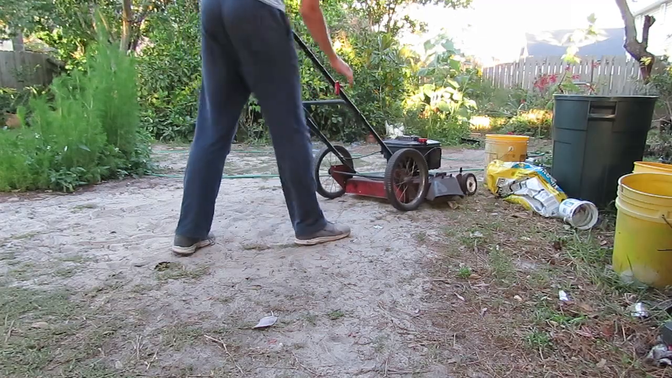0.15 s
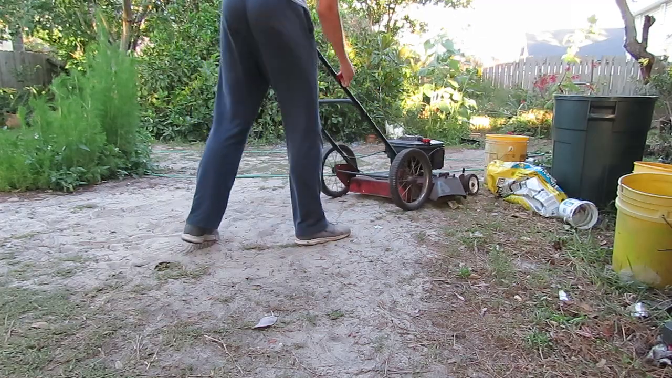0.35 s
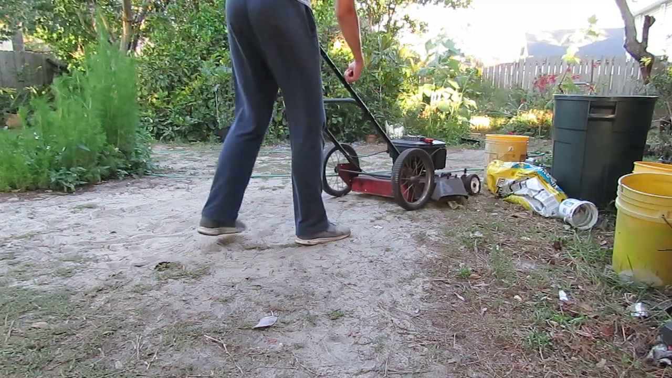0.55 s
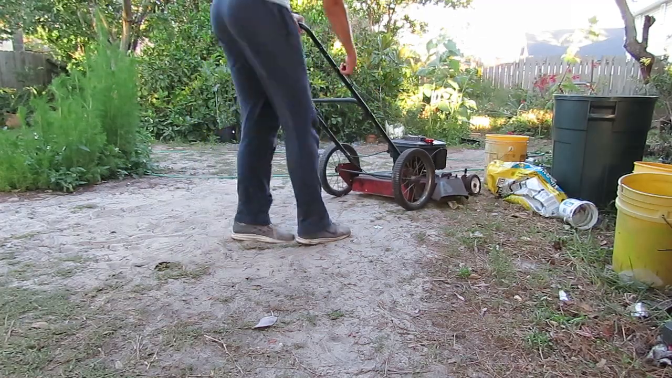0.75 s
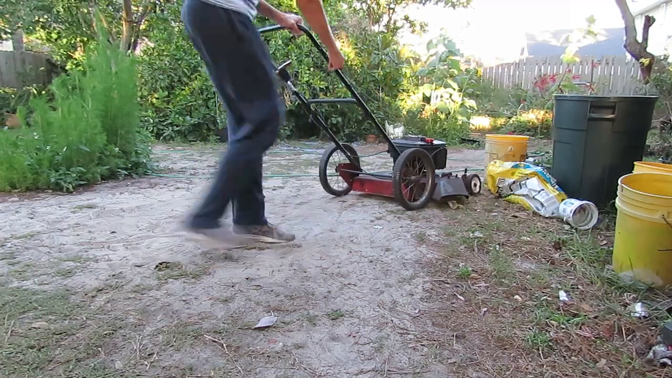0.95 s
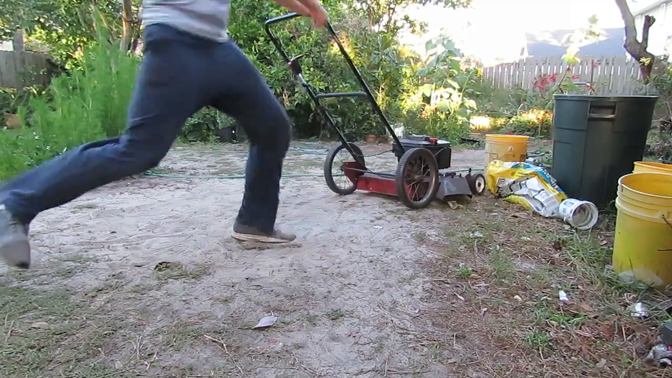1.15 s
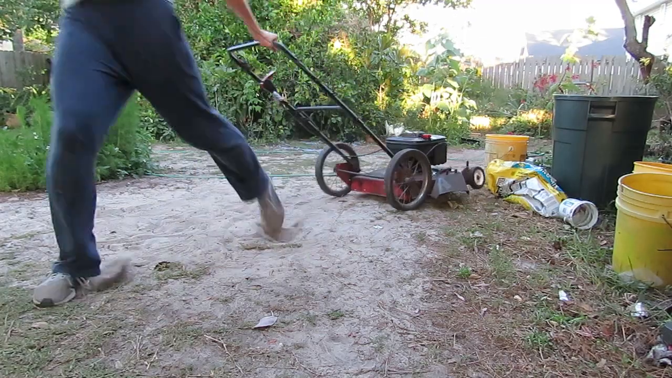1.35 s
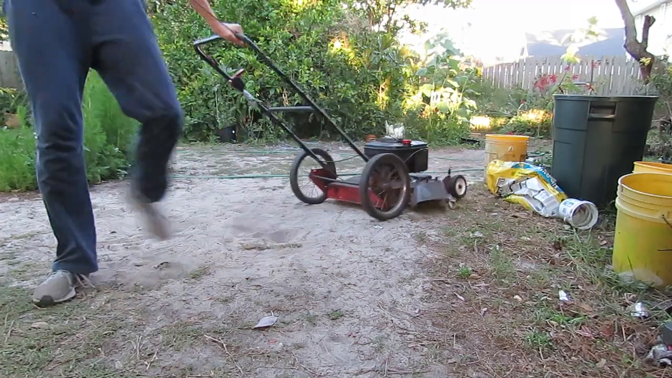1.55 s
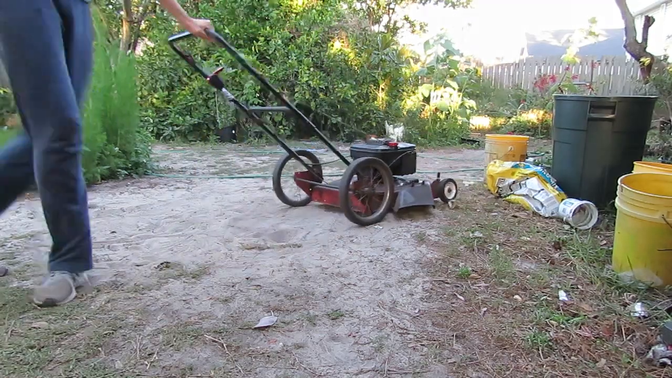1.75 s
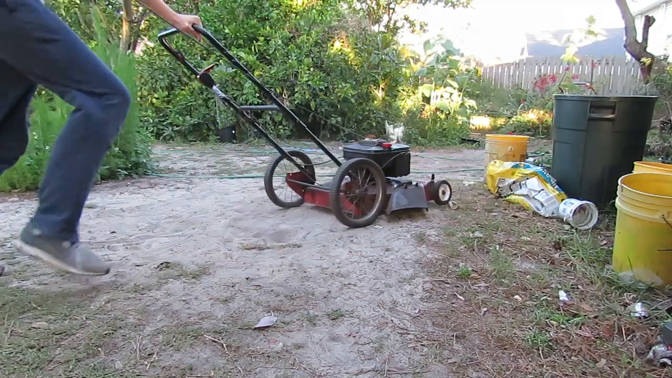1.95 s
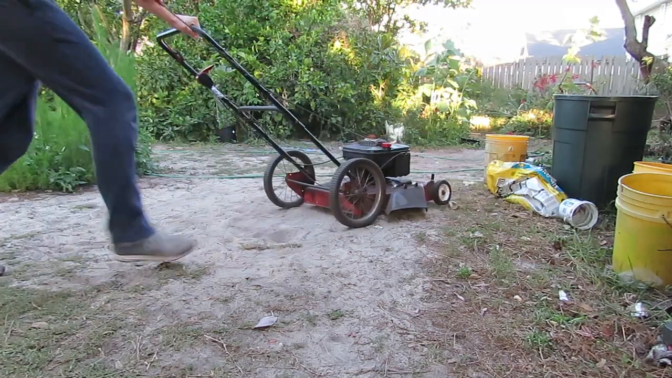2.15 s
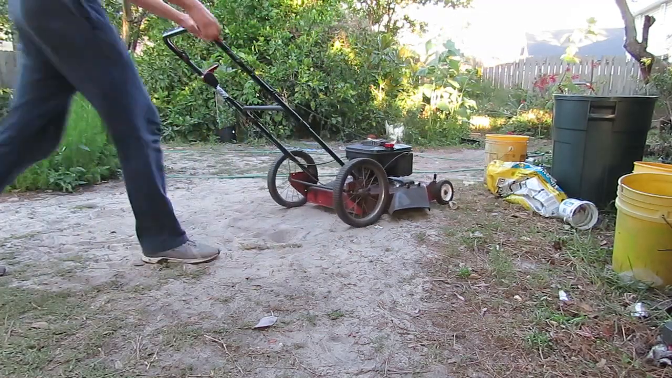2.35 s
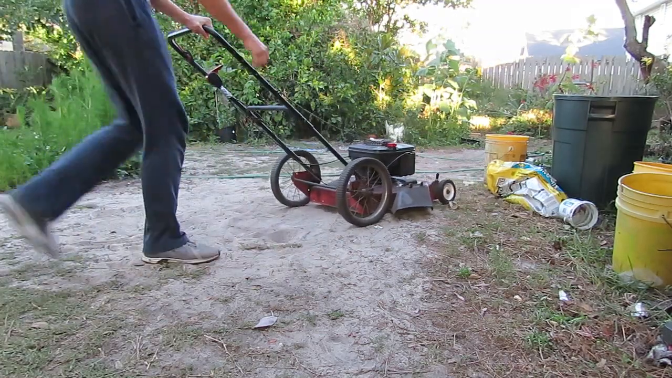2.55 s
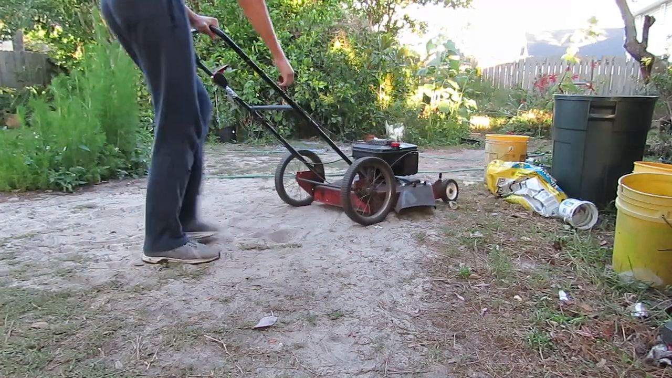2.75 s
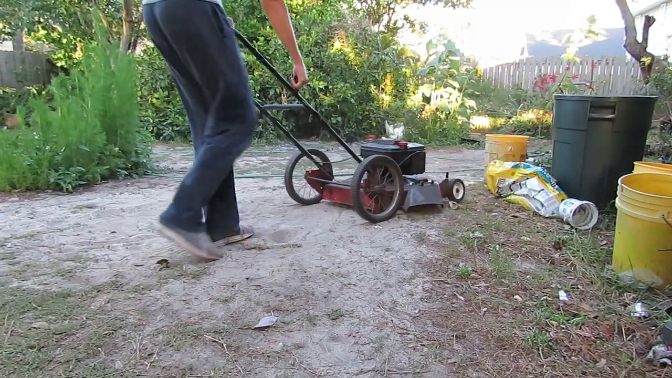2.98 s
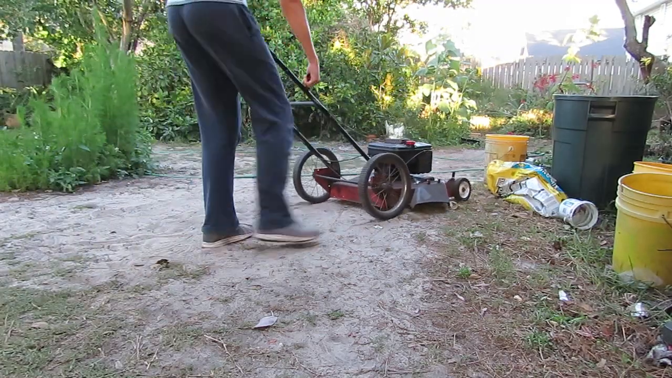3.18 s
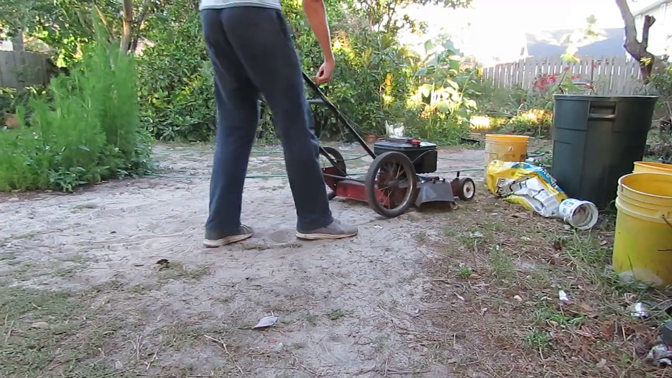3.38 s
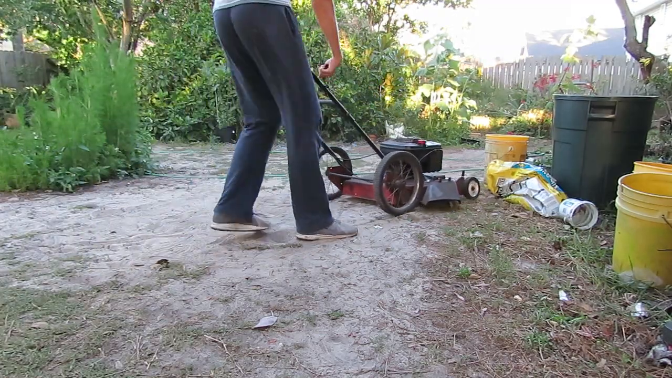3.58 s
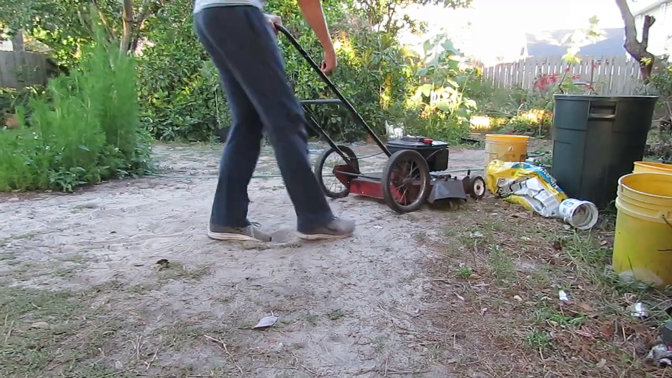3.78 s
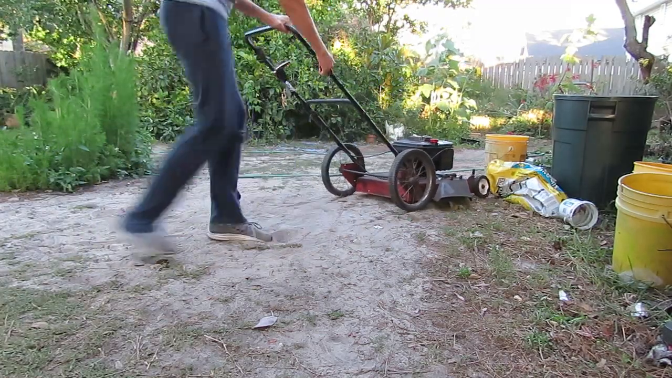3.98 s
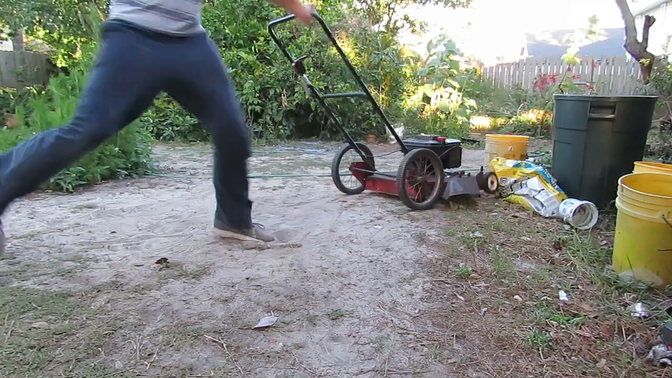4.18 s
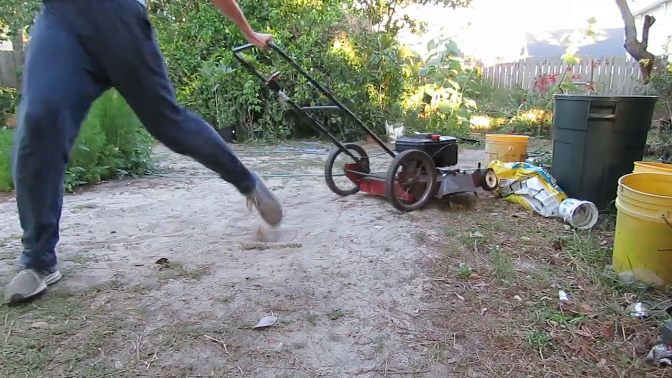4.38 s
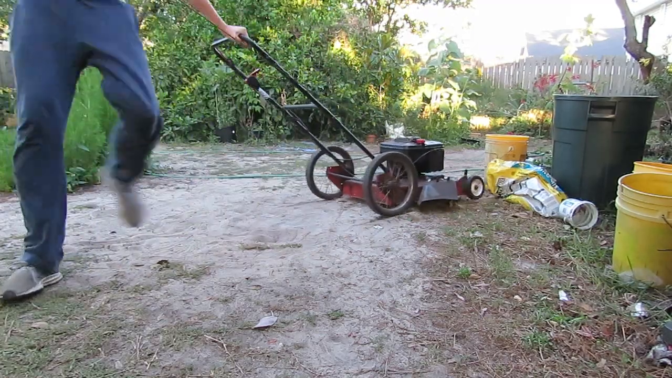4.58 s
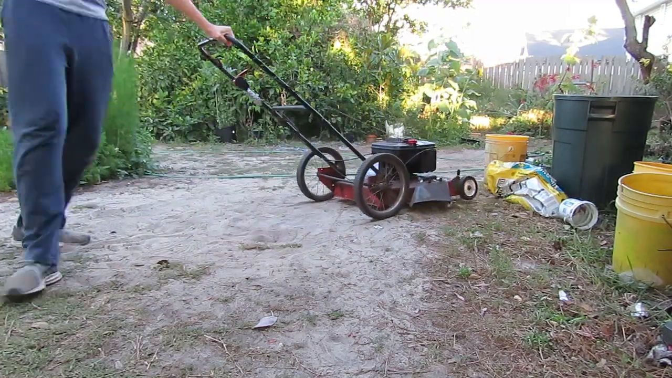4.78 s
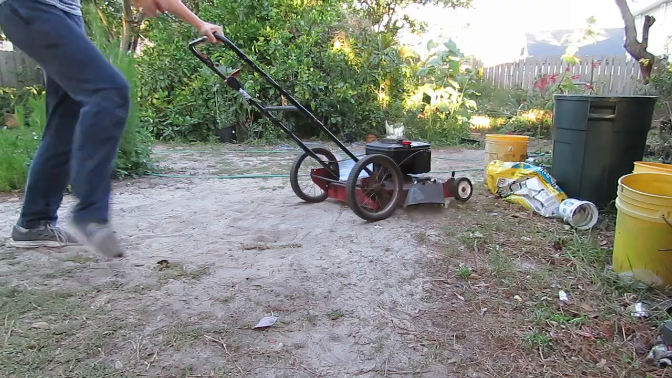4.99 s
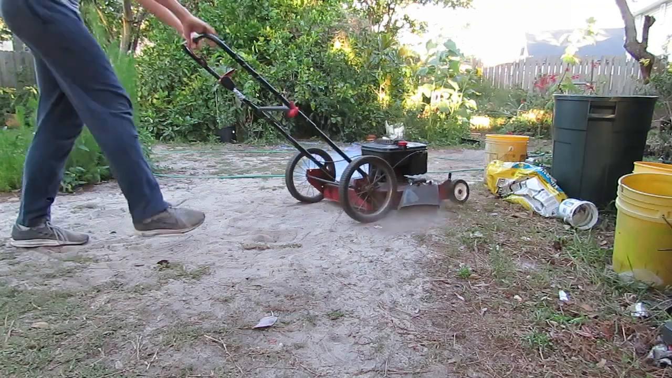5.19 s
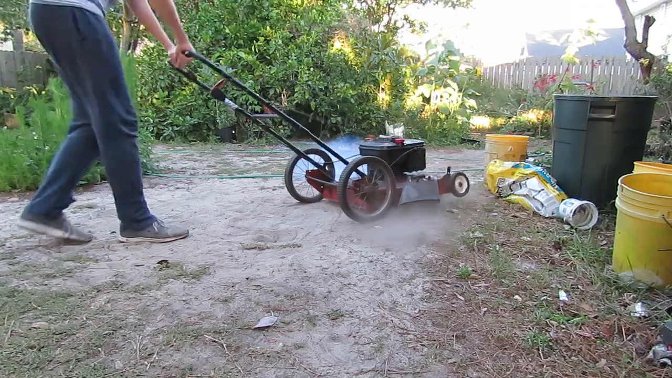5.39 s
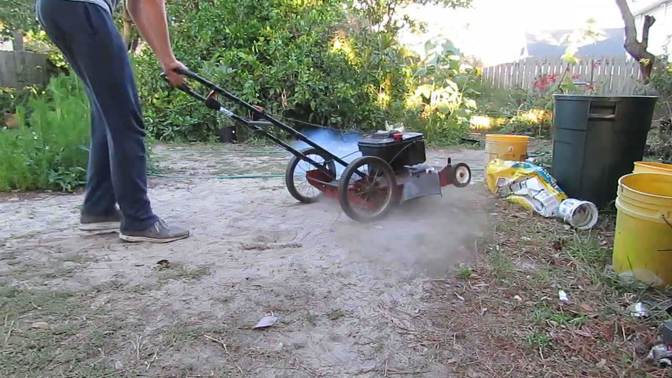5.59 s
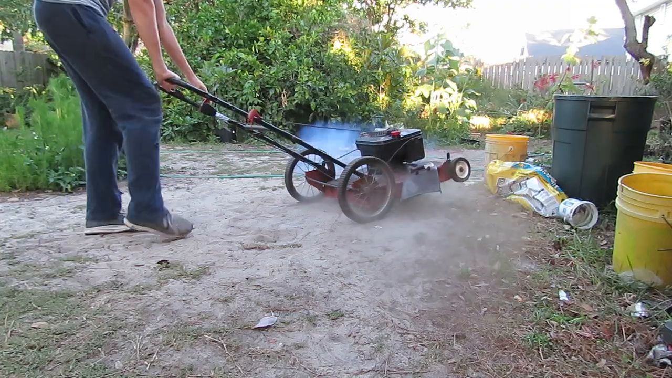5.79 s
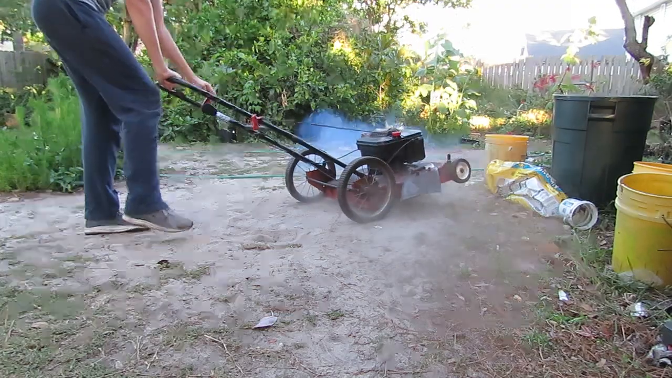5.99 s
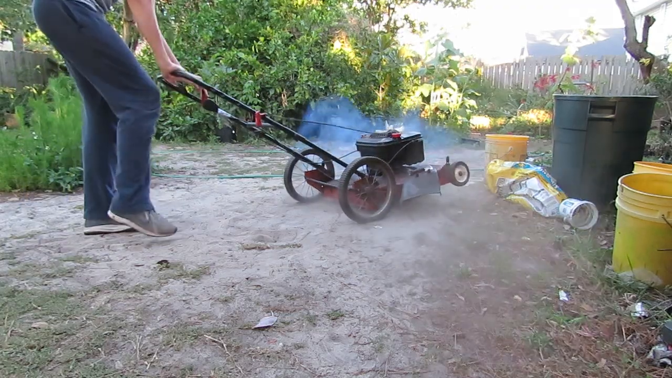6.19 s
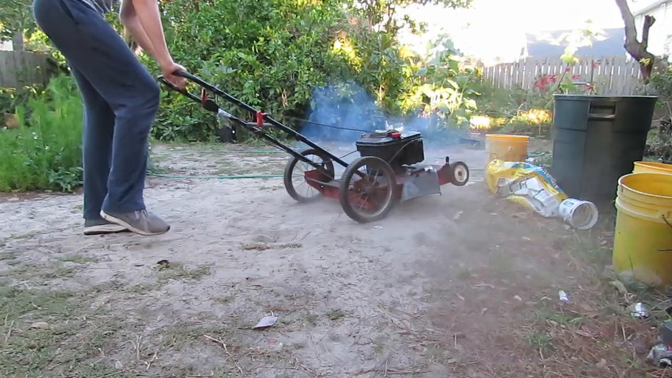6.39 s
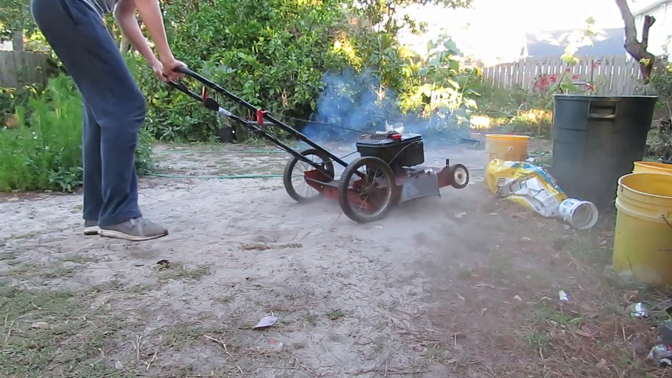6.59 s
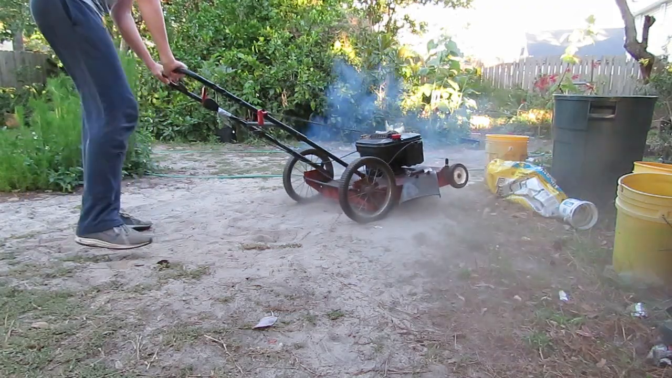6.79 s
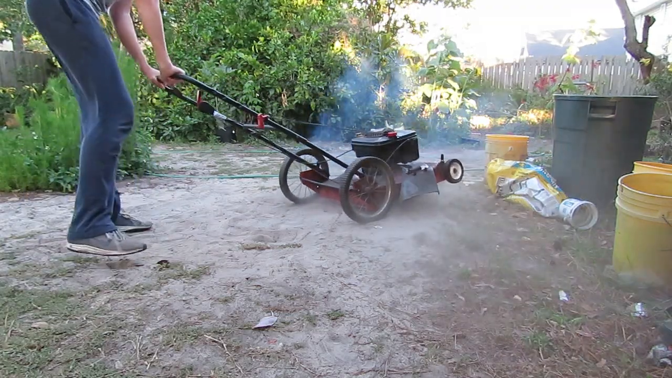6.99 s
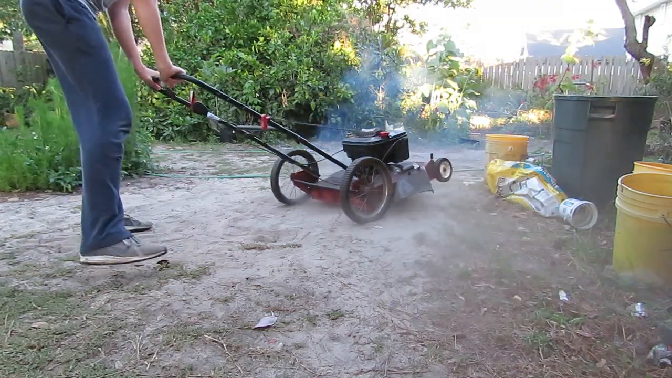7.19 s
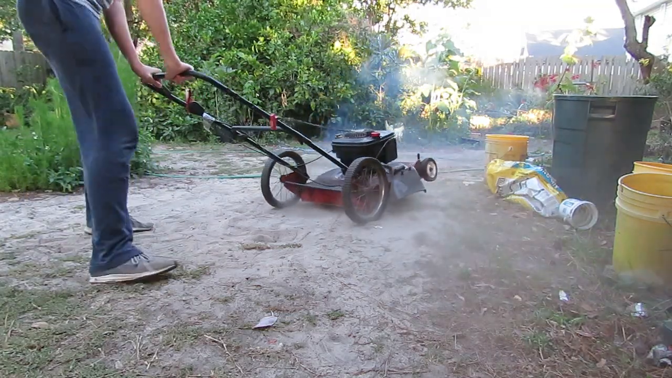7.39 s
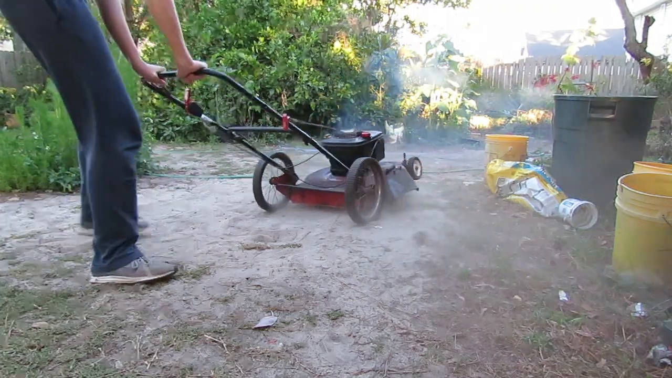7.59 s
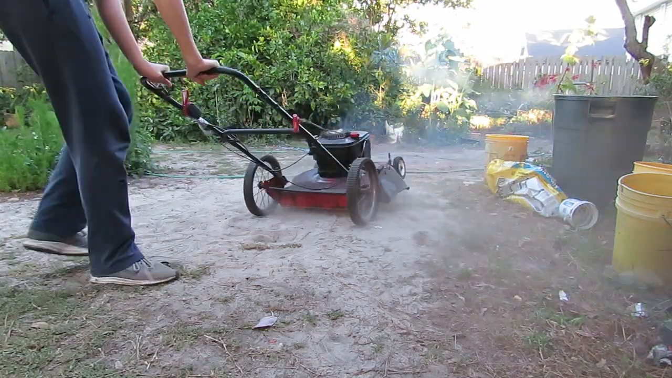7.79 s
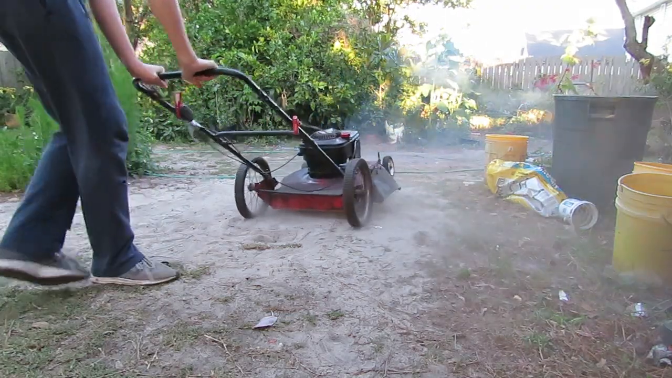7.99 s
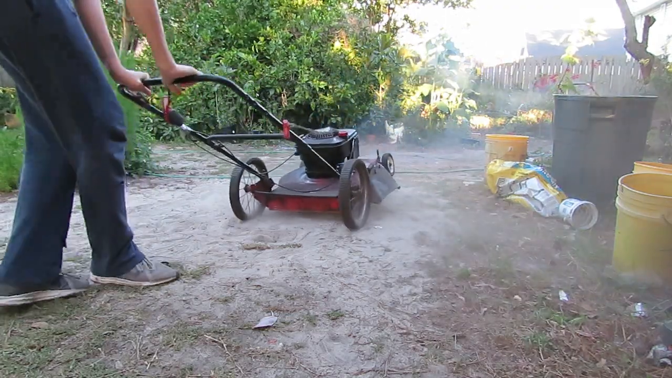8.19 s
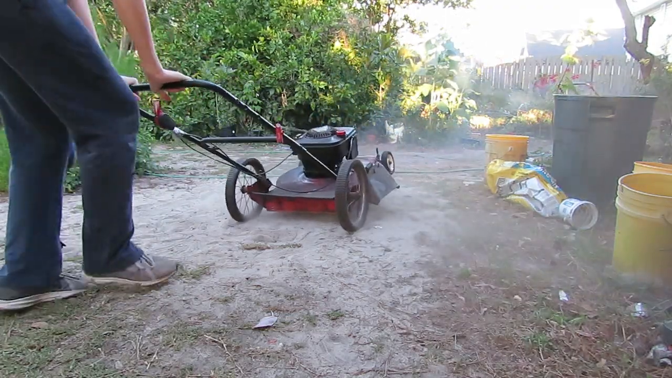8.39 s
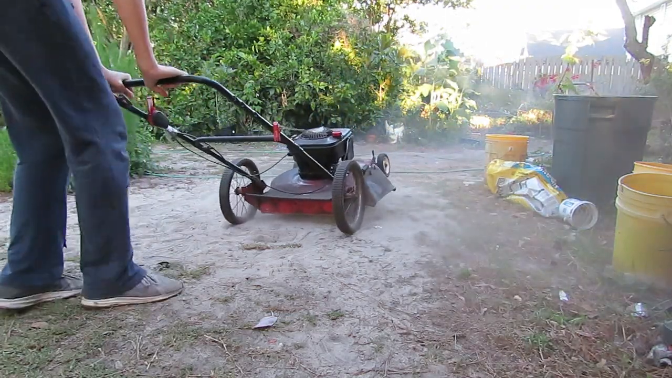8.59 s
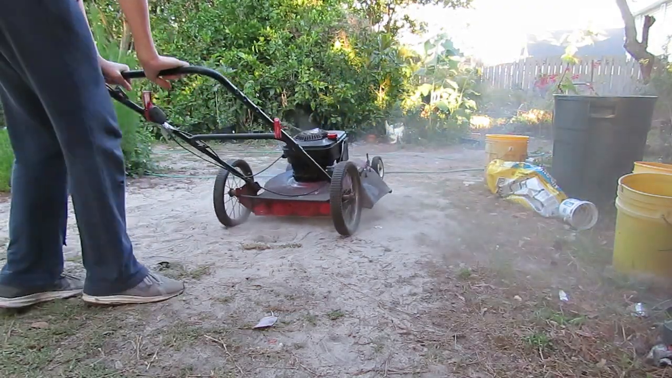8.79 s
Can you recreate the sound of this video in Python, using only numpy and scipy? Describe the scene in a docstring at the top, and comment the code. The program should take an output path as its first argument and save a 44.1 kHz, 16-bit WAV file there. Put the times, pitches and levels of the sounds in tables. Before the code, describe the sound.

Close outdoor stereo sound of an old petrol mower on bare ground. A first cord pull only cranks it, with clacking pawls, low thuds, a squeaky pulley and rope winding back in pulses. Soft footsteps follow. The second pull catches with separate barking pops that blur into a fast throaty putter, joined by blade wind, valve clatter and loose guards; the tone shifts slightly as the mower is turned, running on to the end.

```python
"""Pull-starting a petrol lawn mower

On bare earth in a back yard, a first pull only cranks the engine: recoil rattle, knocks, a scraping rope.
On the second pull the single cylinder fires, gathers speed and runs steadily while the mower is turned.
The exhaust is a train of pressure pulses topped by gated noise; valve gear and guards are clicked noise.
Blade wind is throbbing noise with tones locked to the firing rate; steel parts are decaying modes;
outdoor air is a hush."""
import sys
import numpy as np
from scipy import signal
from scipy.fft import irfft
from scipy.io import wavfile

SR = 44100
rng = np.random.default_rng(int(sys.argv[2]) if len(sys.argv) > 2 else 0)


def digitize_waveform(pressure):
    """Quantize a signal to 16-bit integers and store it at the path in sys.argv[1].

    Rows of a 2-D input are taken as channels; values are limited to [-1, 1].
    """
    field = np.atleast_2d(pressure).T
    bounded = np.clip(field, -1, 1)
    quanta = np.round(bounded * 32767).astype(np.int16)
    wavfile.write(sys.argv[1], SR, quanta)


N = 390285
TIME = np.arange(N) / SR
PAST_END_S = 10  # closes a gate after the scene is over

# Engine speed, one firing for two turns of the blade: (time [s], rate [firings/s])
FIRING_RATE = [(4.6375, 9.1), (4.78, 11.41), (4.95, 15.64), (5.15, 21.03), (5.35, 25.93), (5.5, 28.06),
               (5.65, 26.78), (5.85, 26.9), (6.1, 26.09), (6.35, 26.87), (6.65, 27.18), (7, 27.06),
               (7.35, 27.15), (7.6, 26.96), (8, 27.11), (8.35, 27.13), (8.85, 27.35)]
# Throttle, open at first, shut on overshoot, then corrected: (time [s], opening [0-1])
THROTTLE_OPENING = [(5.35, 1), (5.52, 0.18), (5.76, 0), (5.88, 0.42), (6.08, 0.43), (6.24, 0.06),
                    (6.6, 0.1), (8.85, 0)]
# The mower is swung round: (time [s], share heard from the side [0-1])
TURNING = [(4.75, 0), (5.75, 0.11), (7.2, 0), (7.7, 0.94), (8.85, 0.99)]
STEADY_S = 6  # engine noises are normalised on what follows

# Strength of the exhaust pulses: (time [s], level [dB])
EXHAUST_LEVEL = [(4.63, -21), (5.05, -23), (5.5, -25.5), (5.75, -28), (5.87, -21.5), (7.2, -23),
                 (7.7, -21.5), (8.85, -22.5)]
# Exhaust pulse spectra, from behind and from the side: (frequency [Hz], level [dB])
PULSE_REAR = [(27, -46), (54, -16), (81, -21), (108, -3), (136, -2), (162, -3.5), (190, 0), (217, -4),
              (272, -4), (298, -9), (325, -8), (375, -17), (435, -9), (520, -14), (750, -22), (1200, -28),
              (2400, -44), (8000, -70)]
PULSE_SIDE = [(27, -44), (54, -17), (81, -26), (108, -10), (136, -3), (162, -10), (190, 0), (217, -3),
              (245, -3), (272, -1), (300, -3), (352, -9), (385, -16), (500, -13), (620, -15), (750, -24),
              (1600, -30), (8000, -75)]
# Bins, fence and wall scatter the pulse: (delay [s], polarity [+1 or -1])
PULSE_SCATTER = [(.0071, 1), (.0174, -1), (.0237, -1)]
PULSE_PEAK_S, PULSE_SUCTION, PULSE_DIRECT = .002, .45, .935  # delay; quadrature part; all-pass coefficient
# Spectra of the hot gas's crack, the opening valve's spit and the bark: (frequency [Hz], level [dB])
CRACK_SPECTRUM = [(100, 1.5), (500, 23), (2000, 1.5), (3500, 15.5), (6000, 13.5), (9000, 7), (11200, 9.5),
                  (13000, 6.5), (16000, -35)]
SPIT_SPECTRUM = [(100, -40), (2000, -18), (4500, -13), (6500, -2), (9500, -6), (11200, 9), (12300, -12),
                 (14000, -12), (16000, -19)]
BARK_SPECTRUM = [(200, -18), (700, 5.5), (950, 11.5), (1250, -6), (1500, 3.5), (1800, 4.5), (2150, 5.5),
                 (2500, 5), (3000, 0), (3700, -0.5), (4400, -2), (5500, -7), (7000, -15), (12000, -21)]
SPIT_S, SPIT_UNEVEN_DB = .0007, 4
FULL_CHARGE_S = 4.72  # the first firing is feeble; later ones burn a full charge
# Slow firings bark; the bark fades [dB per firing/s] above a given rate [firings/s]
BARK_DB, BARK_FADES_ABOVE, BARK_FADE_DB, BARK_THROTTLE_DB = -27, 17.8, 1.4, 5
BARK_ECHO_S, BARK_ECHO_DB = .0052, -6  # thrown back by the bins
# Modes of the muffler can: (frequency [Hz], level [dB], t60 [s])
MUFFLER_MODES = [(684, -7, .025), (1480, 0, .025), (1790, -1, .018), (2400, -1, .018), (2650, -4, .015),
                 (3270, -7, .014), (4230, -12, .02), (4550, -10, .02), (5250, -11, .02), (6870, -14, .03),
                 (8260, -16, .04)]

# Level laws of the engine noises: (at final speed [dB], added by open throttle [dB],
# per octave of speed [dB], added from the side [dB])
CRACK_LAW = (-41, 14, 1.5, -2.5)
SPIT_LAW = (-44.5, 8, -2, -6)
HISS_LAW = (-37, 8, 3.5, -2.5)
ROAR_LAW = (-23, 2.5, -1, 0.8)
CLATTER_LAW = (-27.5, -12.5, 4, -4.5)
TIN_LAW = (-37, 4, 2, -1)
SPRING_LAW = (-56, 5, -2, -3)

# Blows of valve gear and piston: (share of the cycle [0-1], level [dB])
VALVE_BLOWS = [(0.032, -4), (.21, 1.5), (.45, -21), (.62, -1), (0.828, -3)]
# Spectra of valve clatter, air hiss, and blade roar from behind and the side: (frequency [Hz], level [dB])
CLATTER_SPECTRUM = [(250, -40), (380, -13), (470, -6), (650, -10), (900, 1), (1600, -1), (2400, -11),
                    (5000, -23), (12000, -38)]
HISS_SPECTRUM = [(1000, -20), (3000, 8), (4400, 3), (7000, -2), (9300, -10), (10600, -11), (13000, -6.5),
                 (16000, -36)]
ROAR_REAR = [(20, -42), (75, -24), (120, -9), (200, -6), (240, -6), (295, 1), (360, -5), (435, 0),
             (520, -7), (600, -4.5), (700, -4), (850, -1), (1400, -4), (1720, -6), (2050, -6), (2600, -14),
             (3300, -20), (6000, -49)]
ROAR_ASIDE = [(20, -30), (75, -16), (120, -10), (200, -4), (240, -4), (285, 2), (350, -2.5), (480, 0),
              (560, -3), (680, 1), (750, -1), (930, 2.5), (1150, 1), (1550, 1.5), (2050, -4), (2800, -11.5),
              (6000, -46)]
ROAR_GRIT, ROAR_FLUTTER_DB = .7, 1.1
# The mower is tipped and moved, swelling the roar: (time [s], level [dB])
ROAR_SWELL = [(5.2, -4.5), (5.33, 0), (5.49, -2), (5.75, 2), (5.9, 2), (6.02, -1), (6.5, 2.5), (6.82, 0.5),
              (7.0, 2), (7.24, -0.5), (7.48, 1), (7.56, 2.5), (8.04, 0.1), (8.46, 2.5), (8.6, 1.8),
              (8.76, 2.5)]
# Ribs and shroud of the deck: (frequency from behind [Hz], frequency from the side [Hz], width [Hz],
# level from behind [dB], level from the side [dB])
SHROUD_MODES = [(314, 304, 12, -36.5, -38), (431, 504, 14, -35, -41), (842, 874, 29, -35.5, -34),
                (960, 970, 34, -37, -33.5), (1362, 1510, 19, -35.5, -44), (2010, 1950, 27, -37.5, -38),
                (2280, 2200, 38, -46, -66), (3100, 3000, 46, -47, -42.5), (4530, 3500, 60, -49, -45)]
SHROUD_WAVER_DB, SHROUD_DRIFT = 1.5, .007
# Loose guards shaken in each cycle: (share of the cycle [0-1], level [dB])
GUARD_HITS = [(.21, 1), (.29, -3.5), (.58, -6), (.82, -3.5)]
# Spectrum of the guards: (frequency [Hz], level [dB])
GUARD_SPECTRUM = [(500, -32), (1500, -1.5), (2200, -7), (3200, 2), (5200, 1), (7000, -6.5), (9500, -17),
                  (16000, -31)]
TIN_UNEVEN_DB, TIN_JITTER_S, TIN_DECAY_S = 3.2, .0007, .0019
# Tones of blade and fan: (multiple of the firing rate, level from behind [dB], level from the side [dB])
BLADE_ORDERS = [(12, -40, -44), (16, -32, -35.5), (17, -38, -42), (18, -39, -38), (20, -38, -43),
                (23, -52, -40), (30, -36, -43), (33, -41, -41), (36, -38, -39)]

# Pulls of the rope: (pawls catch [s], crank at speed [s], rope let go [s],
# crank stops or engine takes over [s], rattle level [dB], scrape level [dB])
ROPE_PULLS = [(1.222, 1.366, 1.604, 2.7, -22, -31.5), (4.22, 4.37, 4.72, 4.8, -20, -31.5)]
CATCH_DB, CATCH_DECAY_S = -0.5, 0.059  # the jolt as the pawls catch
SLACK_S, SLACK_DB = 0.096, -17  # slack rope runs out before the catch
SPIN_UP_S, COAST_S = 0.046, 0.12  # time to spin up; time in which the released spin halves
CHUGS_PER_S, CHUG_DELAY_S, CHUG_DB = 9.4, .045, 2  # the crank chugs at each compression stroke
REWIND_START_S, REWIND_END_S, REWIND_FADE_S, REWIND_DB = 1.73, 2.675, .06, -41
FIRST_SURGE_S, REWIND_TURNS_PER_S, REWIND_SLOWING_PER_S2 = 1.77, 13.15, 5.3
SURGE_DB, SURGE_GROWTH_DB_PER_S = 3, 3.6
# Spectra of the recoil's rattle and the rope's scrape: (frequency [Hz], level [dB])
RATTLE_SPECTRUM = [(40, -64), (100, -18), (165, -7), (208, 1), (294, -0.5), (364, -1), (458, 0.5), (612, 0),
                   (1010, -2.5), (1370, -3.5), (2000, -4), (3030, -12), (3500, -13.5), (5000, -21),
                   (7000, -48)]
SCRAPE_SPECTRUM = [(60, -5), (500, 6), (1500, 12.5), (3200, -6.5), (4500, 3), (5700, 3), (7000, 4),
                   (8200, -6.5), (9000, -7), (11500, -12.5), (13500, -5), (16000, -59)]
# Pawls strike the starter cup: (time [s], level [dB])
PAWL_STRIKES = [(1.255, -16.5), (4.252, -29)]
# Modes of the starter cup and of the steel deck: (frequency [Hz], level [dB], t60 [s])
CUP_MODES = [(2340, -6, 0.13), (2800, -10, 0.035), (3000, -1, 0.032), (3100, -2, 0.055)]
DECK_MODES = [(212, -2, 0.18), (298, 3.5, 0.1), (393.6, -1, 0.16), (433, -2, 0.15), (465, -1, .08),
              (675, 2, 0.07), (800, -5, .06), (867, 1, 0.047), (985, 5, 0.06), (1150, -3, 0.06),
              (1890, -6, 0.15)]
# Modes of the pulley and of the recoil spring: (frequency [Hz], width [Hz], level [dB])
PULLEY_MODES = [(3430, 56, -1), (6880, 110, -1), (9200, 140, -5)]
SPRING_MODES = [(10550, 19, 12), (10500, 150, -24)]
# The rope makes the pulley sing: (time [s], hold from the start [s], level [dB])
PULLEY_SQUEALS = [(1.022, 0.027, -53), (1.46, .09, -43), (1.575, 0.04, -33.5), (1.63, .06, -38),
                  (4.478, 0.094, -33)]
SQUEAL_ATTACK_S, SQUEAL_RELEASE_S = 0.0058, 0.0063
SQUEAL_TONE_DB, SQUEAL_WOBBLE = 2, .004
# Jolts set the recoil spring jingling: (time [s], level [dB])
SPRING_JINGLES = [(1.16, -52), (1.335, -43), (1.43, -53), (1.52, -46), (1.61, -47), (1.845, -49),
                  (4.197, -39), (4.337, -43), (4.395, -53), (4.483, -36)]
JINGLE_ATTACK_S, JINGLE_HOLD_S, JINGLE_RELEASE_S = 0.0033, 0.009, 0.05

# Knocks of deck, wheels, handle and pawls, then grit underfoot and light clicks of the cord:
# (time [s], relative level [dB], tilt [dB/octave], decay constant [s], ring of the struck part [Hz])
HARD_KNOCKS = [(1.231, -15.5, 14, 0.0067, 2920), (1.252, -4.5, 9, 0.0033, 2870),
               (1.333, -20, 6.5, 0.0099, 710), (1.375, -9.5, 2, 0.015, 1670),
               (1.406, -4.5, 2.5, 0.007, 1220), (1.431, -9, -3, 0.01, 684), (1.467, -14, 5.5, 0.012, 2700),
               (1.521, -7, 4.5, 0.01, 1050), (1.545, -10.5, -1.5, 0.01, 295),
               (1.617, -2.5, 1, 0.0061, 1500), (1.652, -6.5, -0.5, 0.0059, 1040),
               (1.702, -13.5, -1, 0.0082, 684), (1.775, -16, 2.5, 0.0068, 1960),
               (1.803, -16.5, 1.5, 0.0079, 930), (1.965, -13.5, 2.5, 0.0065, 1840),
               (1.992, -12, -5.5, 0.0089, 980), (2.0, -9, 0, 0.0078, 970), (2.019, -19, 4, 0.0052, 2530),
               (2.211, -16.5, 3.5, 0.0099, 1640), (2.248, -9.5, -2.5, 0.0084, 960),
               (2.256, -15, 1.5, 0.0076, 1700), (2.708, -10, -3.5, 0.0043, 1330),
               (2.728, -17, -3.5, 0.0078, 1510), (3.342, -18.5, -2.5, 0.0083, 1160),
               (3.353, -21, -5.5, 0.011, 620), (3.461, -13, 4.5, 0.0047, 5130),
               (3.472, -14, -1.5, 0.0093, 2600), (4.193, -16, 5, 0.0077, 1400),
               (4.203, -14.5, -3, 0.014, 940), (4.233, -13, 10, 0.012, 3300), (4.252, -5, 10, 0.003, 2230),
               (4.323, -15, 2.5, 0.0064, 1710), (4.341, -8.5, 1, 0.011, 1390),
               (4.357, -12, 2.5, 0.0056, 1150), (4.371, -20, -1, 0.0058, 900), (4.422, -8, 3, 0.0054, 1890),
               (4.439, -6.5, 2, 0.0072, 770), (4.47, -8, 4, 0.0093, 1840), (4.513, -17, 2, 0.0056, 1210),
               (4.611, -6, 2, 0.0067, 1310), (4.633, -6.5, 0.5, 0.0058, 2110),
               (4.662, -12, 3.5, 0.013, 1150), (4.709, -8, 3.5, 0.011, 1770),
               (4.738, -5.5, 2.5, 0.0016, 2400), (4.809, -15, 2, 0.011, 1700),
               (4.887, -16, -8, 0.013, 1620)]
LIGHT_TICKS = [(.399, -32.5, 8, 0.0096, 7000), (1.02, -28, 1.5, 0.012, 1900), (1.116, -25, 8, 0.0076, 4500),
               (2.8, -32, 5, 0.0036, 7240), (2.984, -30, 5, .003, 9450), (3.726, -40, 8, .004, 4000),
               (3.741, -30, 4, 0.0063, 4050), (4.098, -27, 7, 0.0086, 4140), (4.173, -28, 13, 0.0027, 4480)]
# Spectrum of the contacts before the tilt: (frequency [Hz], level [dB])
KNOCK_SPECTRUM = [(40, -57), (130, -7.5), (210, -14), (300, -2), (1100, 2.5), (1900, -4.5), (3500, -12.5),
                  (7000, -24.5), (11000, -31.5), (16000, -55)]
# Thuds of footfalls and of unfired charges leaving the muffler: (time [s], peak of the mid [dB])
LOW_THUDS = [(0.41, -40), (0.848, -27), (1.241, -27), (1.361, -15), (1.425, -20), (1.514, -15),
             (1.644, -16), (1.818, -21), (2.015, -22), (2.288, -27), (4.363, -14), (4.502, -12),
             (4.634, -13)]
# Spectrum of the thuds: (frequency [Hz], level [dB])
THUD_SPECTRUM = [(30, -23), (60, -15), (85, -3), (120, -4), (210, 10.5), (330, -1), (700, -25), (3000, -61)]
THUD_DECAY_S = .013
# Shoes scuff the earth: (time [s], hold from the start [s], level [dB])
SHOE_SCUFFS = [(0.333, 0.41, -47), (.84, 0.32, -41), (1.215, 1.39, -39.5), (2.623, .25, -52),
               (3.05, 1.4, -51.5)]
# Spectrum of the scuffs: (frequency [Hz], level [dB])
SCUFF_SPECTRUM = [(30, -48), (75, 0), (130, 3.5), (270, 3.5), (500, -1), (1200, -2.5), (3000, -18),
                  (12000, -38)]
SCUFF_ATTACK_S, SCUFF_RELEASE_S = 0.075, 0.16

# Spectrum of the outdoor air: (frequency [Hz], level [dB])
AIR_SPECTRUM = [(12, -47), (20, -23), (77, -6.5), (356, -6), (485, -4.5), (542, -7), (659, -2.5), (948, -4),
                (1150, -8.5), (1750, -13), (2390, -20), (3730, -26), (11700, -45), (16000, -52)]
AIR_DB = -39.5
# Reverberation of the yard: (frequency [Hz], t60 [s])
YARD_T60 = [(200, 0.22), (550, 0.45), (1400, 0.26), (3700, 0.21), (10000, 0.18)]
# Side relative to mid, for the running mower, the pulls and the air: (frequency [Hz], level [dB])
ENGINE_WIDTH = [(60, -29), (110, -74), (200, -40), (380, -16), (700, -21.5), (1290, -19.5), (2380, -15),
                (4400, -12), (8120, -3.5), (15000, -5)]
PULL_SIDE = [(60, -41), (110, -60), (200, -50), (380, -20), (700, -22), (1290, -19.5), (2380, -15.5),
             (4400, -12.5), (8120, -4), (15000, -3)]
AIR_SIDE = [(60, -28), (110, -37), (200, -26), (380, -16), (700, -20.5), (1290, -14), (2380, -11),
            (4400, -7.5), (8120, -2), (15000, 2)]
EDGE_HZ = 15700  # band limit


def exhaust(cycles):
    """Impulsive radiation: each firing sends out a pressure pulse, with turbulent gas noise on top."""
    firings = strokes(cycles, 0, .5, .00004)
    turned = aside()
    running = TIME > STEADY_S
    rear = signal.oaconvolve(firings, puff(PULSE_REAR), "same")
    side = signal.oaconvolve(firings, puff(PULSE_SIDE), "same")
    pulse = (1 - turned) * rear / rear[running].std() + turned * side / side[running].std()
    delayed = np.roll(pulse, SR // 700)  # the side channel lags
    pulse = np.array([pulse, delayed]) * amp(curve(EXHAUST_LEVEL))

    t = np.arange(SR // 30) / SR
    # the jet peaks as the valve opens; a weaker copy comes back off the bins
    jet = np.exp(-((t - .002) / 0.0026) ** 2)
    jet += 1.1 * (t / 0.00076) * np.exp(-t / 0.0029)
    jet += 0.06 * np.exp(-((t - .009) / 0.0005) ** 2)
    uneven = firings * amp(2 * waver(40))
    crack = colour(noise() * convolve(uneven, jet), CRACK_SPECTRUM)
    crack = crack / crack[:, running].std() * engine_gain(CRACK_LAW)

    uneven = firings * amp(SPIT_UNEVEN_DB * waver(40))
    opening = np.exp(-((t - .0016) / SPIT_S) ** 2)
    spit = colour(noise() * convolve(uneven, opening), SPIT_SPECTRUM)
    spit = spit / spit[:, running].std() * engine_gain(SPIT_LAW)

    # the bark rings the muffler can
    bark = noise() * convolve(firings, (t / .0016) * np.exp(-t / 0.0022))
    bark = colour(ringing(off_bins(bark), MUFFLER_MODES, -1), BARK_SPECTRUM)
    bark_db = BARK_DB + BARK_THROTTLE_DB * curve(THROTTLE_OPENING)
    bark_db = bark_db - BARK_FADE_DB * np.maximum(curve(FIRING_RATE) - BARK_FADES_ABOVE, 0)
    bark = bark / bark[:, running].std() * amp(bark_db)

    charge = 0.31 + 0.8 * (TIME > FULL_CHARGE_S)
    return pulse + spit * charge + yard((crack + bark) * charge, -7.5)


def puff(pipe, size=8192):
    """Phase shaping: a quadrature part adds suction to the peak; all-pass echoes scatter it in time."""
    hz = np.fft.rfftfreq(size, 1 / SR)
    spectrum = amp(read(pipe, hz)) * (1 + 1j * PULSE_SUCTION) * np.exp(-2j * np.pi * hz * PULSE_PEAK_S)
    for delay, sign in PULSE_SCATTER:
        echo = sign * np.exp(-2j * np.pi * hz * delay)
        spectrum = spectrum * (PULSE_DIRECT + echo) / (1 + PULSE_DIRECT * echo)
    return np.fft.fftshift(irfft(spectrum))


def machinery(cycles):
    """Cyclic excitation: blows and wind noise follow the phase of the engine cycle."""
    wind_throb = 1 + .2 * np.cos(2 * np.pi * 4 * cycles)  # twice a turn of the blade
    body = engine_gain(ROAR_LAW) * roar(wind_throb) + engine_gain(CLATTER_LAW) * clatter(cycles)
    body = amp(curve(ROAR_SWELL)) * (body + shroud(noise() * wind_throb))
    breath = engine_gain(HISS_LAW) * amp(3.06 * waver(27)) * hiss(cycles)
    return (body + breath) * during(4.68, PAST_END_S, 0.16)


def clatter(cycles):
    """Impact excitation: valve gear and piston strike the casing at fixed shares of each cycle."""
    t = np.arange(SR // 25) / SR
    out = np.zeros((2, N))
    angle = aside() * np.pi / 2
    for share, db in VALVE_BLOWS:
        clicks = amp(db) * strokes(cycles, share, 1.8, .00006)
        # the casing sounds different from each side
        for facing in (np.cos(angle), np.sin(angle)):
            casing = noise(len(t)) * (np.exp(-t / .0022) + .25 * np.exp(-t / .014))
            out += convolve(clicks * facing, casing)
    out = colour(out, CLATTER_SPECTRUM)
    return out / out[0, TIME > STEADY_S].std()


def roar(wind_throb):
    """Turbulence noise of the blade, its spectrum crossfading with the angle of view."""
    swirl = (noise() + ROAR_GRIT * grains(900, 1.6)) * wind_throb * amp(ROAR_FLUTTER_DB * waver(90))
    facing_side = np.sin(aside() * np.pi / 2) ** 2
    rear = unit(colour(swirl, ROAR_REAR))
    side = unit(colour(swirl, ROAR_ASIDE))
    return (1 - facing_side) * rear + facing_side * side


def hiss(cycles):
    """Amplitude modulation: air noise that surges once in each engine cycle."""
    air_noise = off_bins(noise() + 0.47 * grains(900, 2.5))
    surge = 1 + np.exp(-((cycles % 1 - .23) / 0.069) ** 2)
    return unit(colour(air_noise * surge, HISS_SPECTRUM))


def shroud(wind):
    """Forced resonance: blade wind rings the shroud, whose modes shift as the mower rocks and turns."""
    turned, out = aside(), np.zeros((2, N))
    for rear_hz, side_hz, width, rear_db, side_db in SHROUD_MODES:
        hz = (rear_hz + (side_hz - rear_hz) * turned) * (1 + SHROUD_DRIFT * waver(3))
        # shift the moving mode to 0 Hz, low-pass it there, shift it back
        turn, r = np.exp(2j * np.pi * np.cumsum(hz) / SR), np.exp(-np.pi * width / SR)
        ring = (turn * signal.lfilter([1 - r], [1, -r], wind / turn)).real
        out += unit(ring) * amp(rear_db + (side_db - rear_db) * turned + SHROUD_WAVER_DB * waver(6))
    return out * (curve(FIRING_RATE) / FIRING_RATE[-1][1]) ** 2


def tinwork(cycles):
    """Impact excitation: loose guards and linkage shaken in each cycle, uneven in strength and timing."""
    t = np.arange(SR // 50) / SR
    shakes = sum(amp(db) * strokes(cycles, share, TIN_UNEVEN_DB, TIN_JITTER_S) for share, db in GUARD_HITS)
    chatter = noise() * convolve(shakes, np.exp(-t / TIN_DECAY_S))
    chatter = colour(ringing(chatter, MUFFLER_MODES, 5), GUARD_SPECTRUM)
    level = engine_gain(TIN_LAW) * during(5.05, PAST_END_S, .4)
    return chatter / chatter[:, TIME > STEADY_S].std() * level


def blade(cycles):
    """Phase-locked tones: blade and fan hum on multiples of the firing rate, growing as its fourth power."""
    turned = aside()
    hum = np.zeros(N)
    for order, rear_db, side_db in BLADE_ORDERS:
        level = amp(rear_db + (side_db - rear_db) * turned + 2 * waver(6))
        hum += level * np.cos(2 * np.pi * order * cycles + .25 * waver(12))
    hum *= (curve(FIRING_RATE) / FIRING_RATE[-1][1]) ** 4 * during(3.5, PAST_END_S, .3)
    return hum * np.array([[1], [0]])  # mid only


def strokes(cycles, share, uneven_db, jitter_s):
    """Phase locking: one click in each engine cycle, at the given share of it."""
    started = cycles > 0
    at = np.interp(np.arange(int(cycles[-1] - share) + 1) + share, cycles[started], TIME[started])
    size, late = rng.standard_normal((len(at), 2)).T
    clicks = np.zeros(N)
    places = np.round((at + jitter_s * late) * SR).astype(int)
    clicks[np.clip(places, 0, N - 1)] = amp(uneven_db * size)
    return clicks


def engine_gain(law):
    """Source-strength law: level follows throttle, speed in octaves and the angle of view."""
    db, throttle_db, octave_db, side_db = law
    octaves = np.log2(curve(FIRING_RATE) / FIRING_RATE[-1][1])
    return amp(db + throttle_db * curve(THROTTLE_OPENING) + octave_db * octaves + side_db * aside())


def aside():
    """Directivity: share of the mower heard from the side."""
    return curve(TURNING)


def starter():
    """Friction and impact: pawls jolt, the crank rattles and coasts down, the rope scrapes back in."""
    rattle = ringing(yard(grains(1100, 2.6), 1.7), DECK_MODES, -16)
    rattle = unit(colour(rattle, RATTLE_SPECTRUM)) * amp(1.1 * waver(160))
    fibres = yard(grains(1800, 1.6) + .8 * noise(), 0)
    scrape = unit(colour(fibres, SCRAPE_SPECTRUM)) * amp(1.2 * waver(55))
    out = scrape * rewind()
    for catch, spun, let_go, stop, rattle_db, scrape_db in ROPE_PULLS:
        jolt = amp(CATCH_DB) * envelope(catch, 0.013, 0.053, CATCH_DECAY_S)
        jolt += amp(SLACK_DB) * during(catch - SLACK_S, catch + 0.0078, 0.022)
        spin = during(spun - SPIN_UP_S, stop, SPIN_UP_S)
        spin /= 1 + np.maximum(TIME - let_go, 0) / COAST_S
        spin *= amp(CHUG_DB * np.cos(2 * np.pi * CHUGS_PER_S * (TIME - spun - CHUG_DELAY_S)))
        out += amp(rattle_db) * (jolt + spin) * rattle
        out += amp(scrape_db) * (0.53 * jolt + spin ** 2) * scrape
    return out


def rewind():
    """Periodic friction: the rope surges once in each turn of the slowing pulley, ever more deeply."""
    t = TIME - FIRST_SURGE_S
    turns = REWIND_TURNS_PER_S * t - REWIND_SLOWING_PER_S2 * t ** 2 / 2
    depth_db = SURGE_DB + SURGE_GROWTH_DB_PER_S * np.clip(t, 0, 1)
    gate = during(REWIND_START_S, REWIND_END_S, REWIND_FADE_S)
    return amp(REWIND_DB + depth_db * np.cos(2 * np.pi * turns)) * gate


def pawls():
    """Free vibration: the struck starter cup rings in its decaying modes."""
    out, t = np.zeros((2, N)), np.arange(SR // 5) / SR
    ring = sum(amp(db - 60 * t / t60) * np.sin(2 * np.pi * hz * t) for hz, db, t60 in CUP_MODES)
    for s, db in PAWL_STRIKES:
        add(out, s, amp(db) * ring)
    return out


def pulley(cycles):
    """Rubbed resonance: the pulley sings under the rope; the spring jingles with jolts and the engine."""
    singing = sum(amp(db) * envelope(s, SQUEAL_ATTACK_S, hold, SQUEAL_RELEASE_S)
                  for s, hold, db in PULLEY_SQUEALS)
    jingling = sum(amp(db) * envelope(s, JINGLE_ATTACK_S, JINGLE_HOLD_S, JINGLE_RELEASE_S)
                   for s, db in SPRING_JINGLES)
    shaken = engine_gain(SPRING_LAW) * during(FIRING_RATE[0][0], PAST_END_S, 0.64)
    shaken *= 1.6 - 1.2 * (cycles % 1)  # strongest at each firing
    wobbling_hz = PULLEY_MODES[0][0] * (1 + SQUEAL_WOBBLE * waver(40))
    tone = np.sin(2 * np.pi * np.cumsum(wobbling_hz) / SR)
    squeal = unit(rubbed(PULLEY_MODES) + amp(SQUEAL_TONE_DB) * tone)
    return squeal * singing + rubbed(SPRING_MODES) * (jingling + shaken)


def rubbed(modes):
    """Random excitation: rubbing keeps high steel modes ringing unevenly."""
    t = np.arange(SR // 5) / SR
    ring = np.zeros((2, N))
    for hz, width, db in modes:
        response = np.exp(-np.pi * width * t) * np.sin(2 * np.pi * hz * t)
        ring += amp(db) * unit(convolve(noise(), response))
    return unit(ring) * amp(1.5 * waver(60))


def blows(rows):
    """Contact mechanics: a dying chatter of metal or grit rings the struck part; its tilt sets brightness."""
    out, t = np.zeros((2, N)), np.arange(SR // 5) / SR
    for s, db, tilt_db, length, hz in rows:
        steps = np.repeat(rng.exponential(1, len(t)), SR // 1500)[:len(t)]
        bounces = .35 + steps ** .7
        contact = noise(len(t)) * bounces * (1 - np.exp(-t / (.15 * length))) * np.exp(-t / length)
        chatter = colour(contact, KNOCK_SPECTRUM, tilt_db)
        ring = convolve(chatter, np.cos(2 * np.pi * hz * t) * np.exp(-t * hz / 2.5))  # dies in a few cycles
        blow = unit(chatter) + .5 * unit(ring)
        # energy in proportion to the decay constant
        blow *= 0.32 * np.sqrt(length * SR) / np.linalg.norm(blow[0])
        add(out, s, amp(db) * blow)
    return out


def thuds():
    """Low-frequency impulses: short decaying puffs of bass noise."""
    out, t = np.zeros((2, N)), np.arange(SR // 5) / SR
    for s, db in LOW_THUDS:
        thud = colour(noise(len(t)) * np.exp(-t / THUD_DECAY_S), THUD_SPECTRUM)
        add(out, s, amp(db) * thud / abs(thud[0]).max())
    return out


def shoes():
    """Friction noise: soles scuff the bare earth as pressure rises and falls."""
    pressure = sum(amp(db) * envelope(s, SCUFF_ATTACK_S, hold, SCUFF_RELEASE_S)
                   for s, hold, db in SHOE_SCUFFS)
    return unit(colour(noise() + 0.44 * grains(900, 1.7), SCUFF_SPECTRUM)) * pressure


def off_bins(x):
    """Specular reflection: the bins throw the sound back a moment later."""
    return x + amp(BARK_ECHO_DB) * np.roll(x, round(BARK_ECHO_S * SR), 1)


def yard(x, wet_db):
    """Diffuse reverberation: fences, bins and bushes scatter a short tail."""
    hz, t, z = signal.stft(noise(SR // 2), SR, nperseg=256)
    decay = amp(-60 * t / read(YARD_T60, hz)[:, None])
    tail = signal.istft(z * decay, SR, nperseg=256)[1]
    tail *= np.clip(np.arange(tail.shape[1]) / SR / 0.0055, 0, 1)  # builds up over 5.5 ms
    return x + amp(wet_db) * convolve(x, tail / np.linalg.norm(tail[0]))


def outdoor_air():
    """Stationary noise: a steady, filtered hush."""
    return unit(colour(noise(), AIR_SPECTRUM)) * amp(AIR_DB)


def ringing(x, modes, ring_db):
    """Modal superposition: a steel shell adds its modes to whatever shakes it."""
    t = np.arange(SR // 3) / SR
    ring = sum(amp(db - 60 * t / t60) * np.cos(2 * np.pi * hz * t) for hz, db, t60 in modes)
    return x + amp(ring_db) * convolve(x, ring / np.linalg.norm(ring))


def colour(x, points, tilt_db=0, size=8192):
    """Minimum-phase filtering: a causal response with the given spectrum, tilted about 1 kHz."""
    hz = abs(np.fft.fftfreq(size, 1 / SR))
    tilt = tilt_db * np.log2(np.maximum(hz, 200) / 1000)  # constant below 200 Hz
    log_gain = np.log(amp(read(points, hz) + tilt))
    # the Hilbert transform of the log gain gives the phase
    response = np.fft.ifft(np.exp(np.conj(signal.hilbert(log_gain)))).real
    return convolve(x, response[:size // 2])


def convolve(x, response):
    """Linear filtering of each channel, keeping the length."""
    return signal.oaconvolve(np.atleast_2d(x), np.atleast_2d(response), axes=1)[:, :x.shape[-1]]


def noise(size=N):
    """White noise, independent in the mid and side channels."""
    return rng.standard_normal((2, size))


def grains(per_s, spread_db):
    """Shot noise: sparse clicks of unequal size."""
    size = amp(spread_db * np.minimum(rng.exponential(1, N), 4))
    return unit(noise() * size * (rng.random(N) < per_s / SR))


def waver(per_s):
    """Random modulation: straight lines between Gaussian values drawn at the given rate."""
    knots = np.arange(0, PAST_END_S, 1 / per_s)
    return np.interp(TIME, knots, rng.standard_normal(len(knots)))


def envelope(start, attack, hold, release):
    """Exponential decay after a straight rise and a hold counted from the start."""
    t = TIME - start
    return np.clip(t / attack, 0, 1) * np.exp(-np.maximum(t - hold, 0) / release)


def during(start, end, fade):
    """Gating with straight fades inside both edges."""
    return np.clip((TIME - start) / fade, 0, 1) * np.clip((end - TIME) / fade, 0, 1)


def curve(rows):
    """Linear interpolation of a time table at every sample."""
    return np.interp(TIME, *np.transpose(rows))


def read(points, hz):
    """Interpolation of a spectrum table on a log-frequency axis."""
    f, value = np.transpose(points)
    return np.interp(np.log(hz + 1), np.log(f + 1), value)


def amp(db):
    """Decibel law: level to amplitude ratio."""
    return 10 ** (np.asarray(db) / 20)


def unit(x):
    """Normalisation to an rms of 1."""
    return x / np.sqrt(np.mean(x ** 2) + 1e-20)


def add(mix, s, sound):
    """Superposition of a sound from s seconds on."""
    part = mix[:, round(s * SR):][:, :sound.shape[-1]]
    part += sound[..., :part.shape[1]]


def stereo(mid_side, width):
    """Mid-side decoding: left is the sum and right the difference, after the side is filtered."""
    mid, side = mid_side[0], colour(mid_side[1], width)[0]
    return np.array([mid + side, mid - side])


def scene():
    """Superposition of the running engine, the rope pulls and the outdoor air."""
    cycles = np.cumsum(curve(FIRING_RATE) * (TIME >= FIRING_RATE[0][0])) / SR
    engine = exhaust(cycles) + machinery(cycles) + tinwork(cycles) + blade(cycles)
    impacts = yard(ringing(blows(HARD_KNOCKS), DECK_MODES, -15.5) + blows(LIGHT_TICKS), -5)
    pulls = impacts + thuds() + starter() + pawls() + pulley(cycles) + shoes()
    return stereo(engine, ENGINE_WIDTH) + stereo(pulls, PULL_SIDE) + stereo(outdoor_air(), AIR_SIDE)


def record(dry):
    """Transducer limits: deep bass is shed, peaks are held at full scale, then the band is limited."""
    thinned = signal.sosfilt(signal.butter(2, 32, "high", fs=SR, output="sos"), dry)
    band = signal.firwin(401, EDGE_HZ, window=("kaiser", 9), fs=SR)
    return signal.oaconvolve(np.clip(thinned, -1, 1), band[None], "same")


dry = scene()
out = record(dry)
digitize_waveform(out)
```